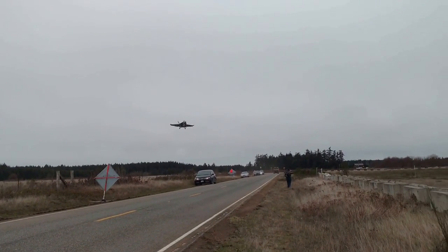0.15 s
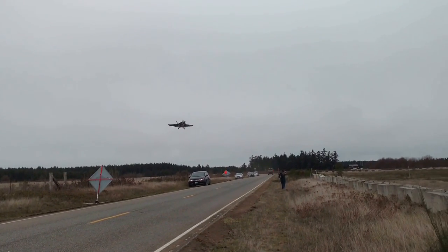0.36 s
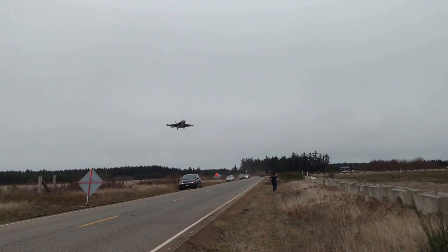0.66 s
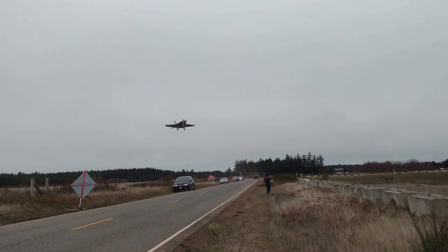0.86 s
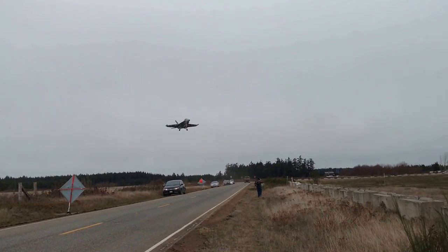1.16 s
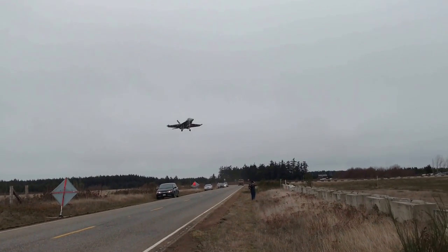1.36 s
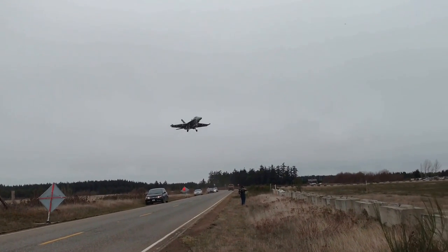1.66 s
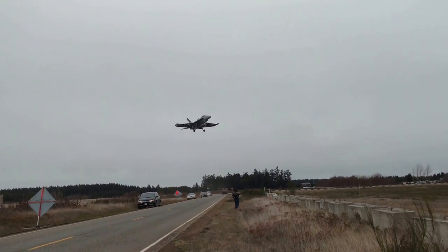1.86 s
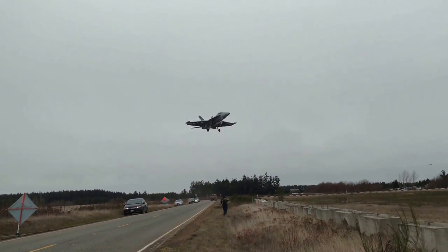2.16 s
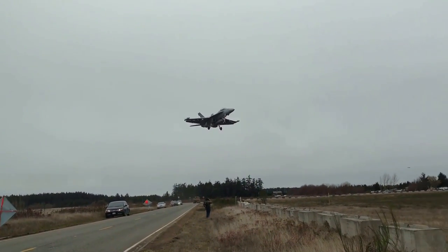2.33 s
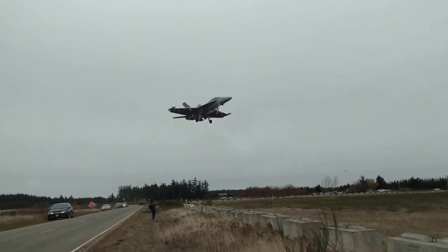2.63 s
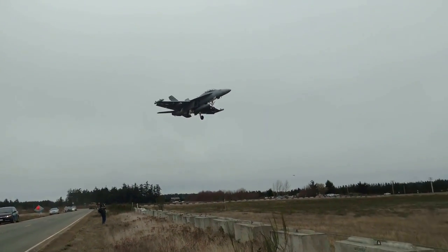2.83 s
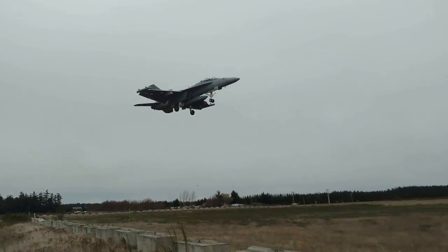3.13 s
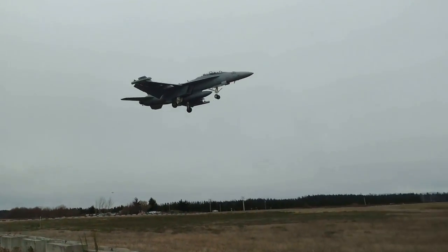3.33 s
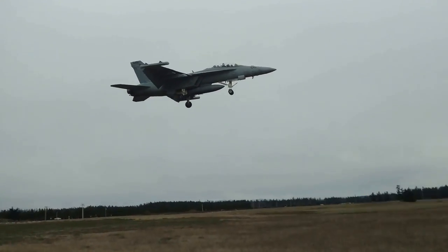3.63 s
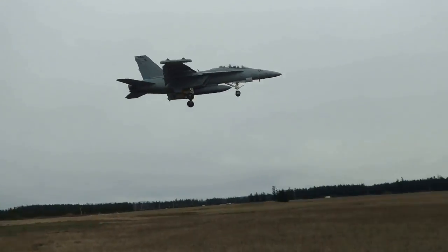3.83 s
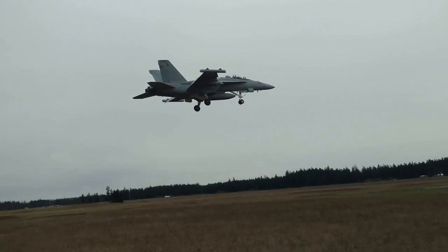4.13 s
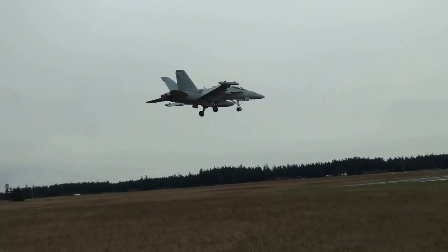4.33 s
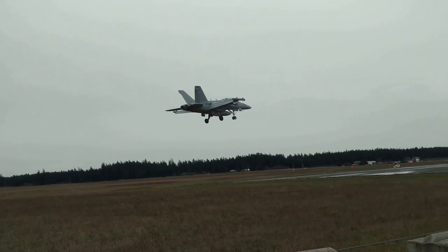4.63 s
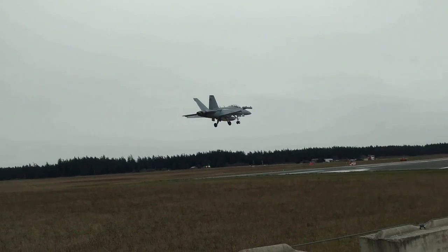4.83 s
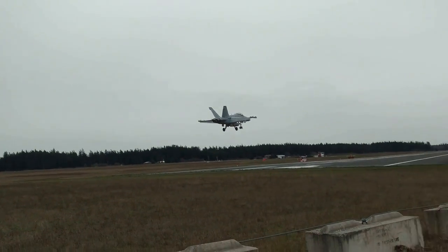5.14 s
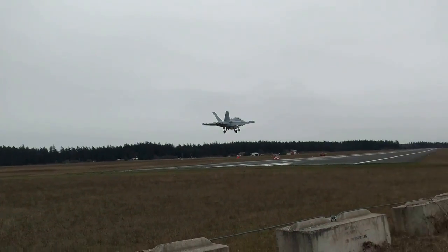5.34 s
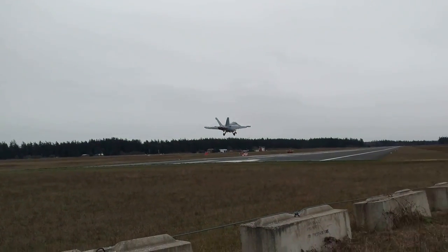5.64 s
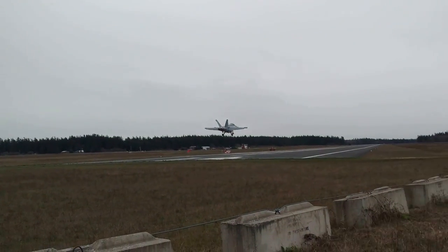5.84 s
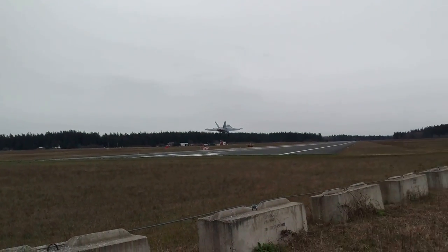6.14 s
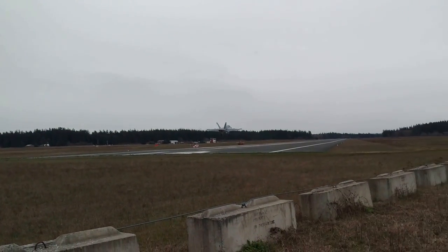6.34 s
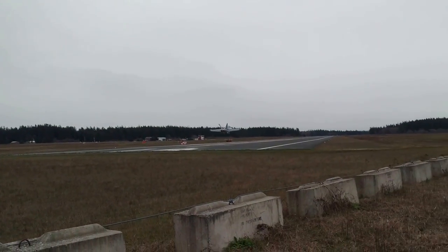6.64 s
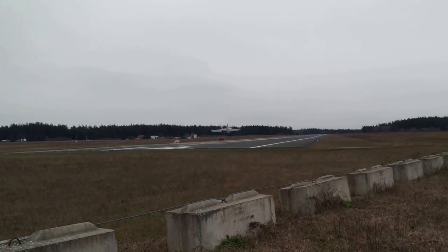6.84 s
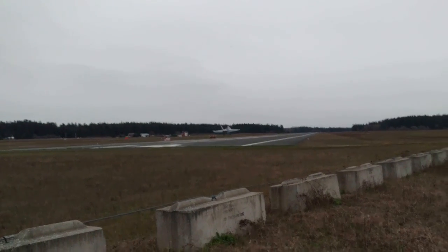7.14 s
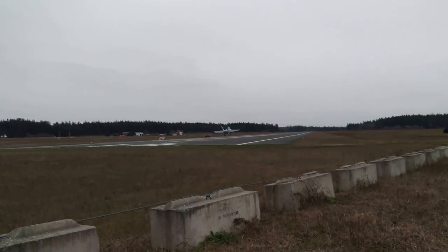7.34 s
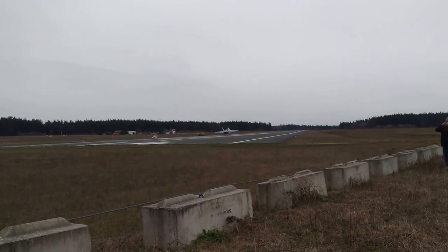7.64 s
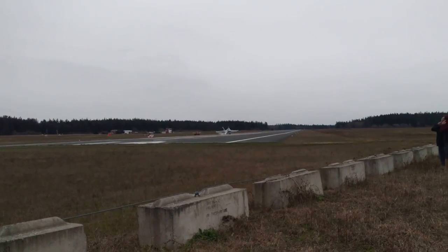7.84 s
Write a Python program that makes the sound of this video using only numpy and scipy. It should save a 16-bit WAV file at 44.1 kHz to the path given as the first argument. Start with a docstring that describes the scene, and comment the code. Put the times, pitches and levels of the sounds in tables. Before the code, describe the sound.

Outdoors, a piercing jet whine builds over airy roar, drops in pitch at the pass, and bursts into tearing, crackling exhaust that fades to rumble.

```python
"""Roadside under a landing approach: a fighter jet passes 55 m from a phone with two microphone ports.
A thin rustle and two ticks sound close by at first, while the intakes howl and whine ahead of the jet.
It comes abreast at 4.2 s; then the exhaust roars and cracks, as noise mixed with random shock fronts,
under spitting treble like that of overloaded peaks. Echoes off the grass comb the roar throughout.
The roar recedes, with a last tick near the end; the phone widens the stereo, flattens peaks and cuts the top."""
import sys
import numpy as np
from scipy import signal
from scipy.fft import rfft, irfft
from scipy.io import wavfile
from scipy.ndimage import map_coordinates

SR = 44100
rng = np.random.default_rng(int(sys.argv[2]) if len(sys.argv) > 2 else 0)


def wrap_up_sound(samples):
    """Save the sound to the file named by the first command line argument, as 16-bit audio."""
    columns = np.atleast_2d(samples).T
    # keep every value between -1 and 1, then stretch to whole-number steps
    tamed = np.clip(columns, -1, 1)
    steps = np.round(tamed * 32767).astype(np.int16)
    wavfile.write(sys.argv[1], SR, steps)


N = 351918
FRAME, HOP = 1024, 256  # samples
TIME = np.arange(N) / SR
FRAME_S = np.arange(-(-N // HOP) + 1) * HOP / SR
BIN_HZ = np.fft.rfftfreq(FRAME, 1 / SR)[:, None]


def undb(db):
    """Decibels to gain."""
    return 10 ** (np.asarray(db) / 20)


def read(table, at):
    """The columns of a table, joined by straight lines."""
    key, *columns = np.transpose(table)
    return [np.interp(at, key, column) for column in columns]


def over_pitch(hz, values):
    """Values joined on a log-frequency axis."""
    return np.interp(np.log(BIN_HZ + 1), np.log(hz), values)


def spectra(x):
    """Short-time spectra of a sound."""
    return signal.stft(x, nperseg=FRAME, noverlap=FRAME - HOP)[2]


def sound(z):
    """Short-time spectra back to samples."""
    return signal.istft(z, nperseg=FRAME, noverlap=FRAME - HOP)[1][..., :N]


def walk(rate, at):
    """Smooth chance with about `rate` turns a second and a spread near 1."""
    steps = rng.standard_normal(8192)
    return map_coordinates(steps, [at * rate], order=3, mode="wrap")


def bell(at, centre, width):
    """A smooth rise and fall around one moment or pitch."""
    return np.exp(-.5 * ((at - centre) / width) ** 2)


def band(track, width):
    """A moving peak or notch in dB; its width is a share of its centre."""
    hz, lift_db = read(track, FRAME_S)
    return lift_db * bell(BIN_HZ, hz, width * hz)


# faint ticks near the phone, before the thinning filter: start_s [s], peak_db [dB]
TICKS = [(.307, -48), (.577, -50), (7.544, -47)]
TICK_DECAY_S, HISS_DB = 0.00085, -82
RUSTLE_S, RUSTLE_WIDTH_S, RUSTLE_DB = 0.16, 0.053, -56.5


def rustle(low_hz, high_hz):
    """A brief rustle and three ticks close to the phone over faint hiss: noise thinned to a high band."""
    level = undb(HISS_DB) + undb(RUSTLE_DB) * bell(TIME, RUSTLE_S, RUSTLE_WIDTH_S)
    for start_s, peak_db in TICKS:
        decay = np.exp(-np.abs(TIME - start_s) / TICK_DECAY_S)
        level = level + undb(peak_db) * (TIME >= start_s) * decay
    thin = signal.butter(2, [low_hz, high_hz], "bandpass", fs=SR, output="sos")
    return signal.sosfilt(thin, level * rng.standard_normal((2, N)))


# lag of the echo off the grass behind the direct sound: time_s [s], lag_ms [ms]
GROUND_LAG = [(0.0, 0.57), (2.0, 0.75), (2.5, 1.48), (2.9, 2.03), (3.4, 3.1), (4.2, 3.07), (4.7, 2),
              (5.1, 2.02), (5.8, 1.94), (6.5, 1.78), (7.9, 1.54)]


def ground(reflection, soft_hz):
    """The echo off the grass combs the lows; the treble is soaked up."""
    lag_s = read(GROUND_LAG, FRAME_S)[0] / 1000
    echo = reflection / (1 + (BIN_HZ / soft_hz) ** 2)
    return np.abs(1 + echo * np.exp(-2j * np.pi * BIN_HZ * lag_s))


# Moving bands of the echoes, each with columns: time_s [s], centre_hz [Hz], lift_db [dB]
# hollow echo band that sinks as the jet nears
ECHO_BAND = [(1.4, 1990, 2.5), (1.82, 1930, 8.5), (2.05, 1970, 1.5), (2.33, 1810, 8.5), (2.48, 1860, 4),
             (2.65, 1820, 9), (2.87, 1710, 7.5), (3.05, 1590, -7)]
# lowest peak of the grass-echo comb, heard as a hump in the rumble
LOW_ECHO_PEAK = [(0, 214, 5), (2.2, 246, 1.5), (3.15, 213, -0.5), (3.9, 177, 10.5), (4.65, 246, 11),
                 (5.1, 279, 3.5), (6.5, 248, 5), (6.95, 254, 16), (7.9, 254, 8)]
# first notch of the grass-echo comb, deep as the jet leaves
ECHO_NOTCH = [(0, 480, 0.5), (1.15, 462, -4), (1.5, 462, 1), (5.3, 328, 4), (5.8, 305, -18), (6.4, 325, -9),
              (7.9, 354, -6.5)]
# peak of the comb from the grass echo, gliding through the roar
ECHO_PEAK = [(3.4, 790, 0), (3.9, 755, 4.5), (4.6, 710, 0.5), (4.9, 526, 2), (5.1, 510, 8), (5.85, 557, 4),
             (6.4, 474, 4), (7.9, 500, 7)]
# higher peak of the grass-echo comb, strongest once the jet has passed
UPPER_ECHO_PEAK = [(2.8, 1600, 1.5), (3.3, 1600, 0), (4.2, 1590, -1), (4.6, 1590, 5), (5.5, 1524, 9.5),
                   (6, 1450, 3.5), (7.9, 1460, 6)]


def echo_bands():
    """Echoes strengthen some pitches and weaken others; each peak or notch is drawn as a moving lift in dB."""
    low = band(LOW_ECHO_PEAK, width=0.17) + band(ECHO_NOTCH, width=0.23)
    high = band(ECHO_PEAK, width=0.093) + band(UPPER_ECHO_PEAK, width=0.078)
    return low + high + band(ECHO_BAND, width=0.045)


# compressor blade tone, moved by throttle and Doppler: time_s [s], pitch_hz [Hz], relative level_db [dB]
WHINE = [(.03, 5440, -45), (.27, 5670, -33), (.42, 5870, -44.5), (.65, 6000, -42.5), (.95, 5860, -43.5),
         (1.25, 5620, -38), (1.46, 5300, -31), (1.7, 5060, -29), (2, 4800, -30), (2.3, 4740, -28),
         (2.55, 4740, -25.5), (2.8, 4870, -27.5), (2.97, 4640, -22), (3.13, 4500, -27.5),
         (3.19, 4530, -30.5), (3.42, 4200, -35), (3.9, 3680, -32), (4.3, 3550, -80)]


def whine(level_db, width_hz, skirt_hz, skirt_db, haze_hz, haze_db, flicker_db, steady, octave_db):
    """Compressor blade tone: a wavering line and its octave, with a skirt and a wide haze from churning air."""
    hz, db = read(WHINE, TIME)
    wavering_hz = hz * (1 + 0.0043 * walk(15, TIME) + .006 * walk(160, TIME))
    turn = np.exp(2j * np.pi * np.cumsum(wavering_hz) / SR)
    core, skirt, haze = (walk(w, TIME) + 1j * walk(w, TIME) for w in (width_hz, skirt_hz, haze_hz))
    core = (core + steady) / np.sqrt(1 + steady ** 2 / 2)
    far = np.interp(TIME, [1.2, 2.1], [.6, .1])  # from far off the tone is more smeared
    tone = core * (1 - far) + skirt * (undb(skirt_db) + far * 0.36) + haze * far * undb(haze_db)
    # the air soaks up the octave at a distance
    overtone = undb(octave_db) * (1 - far) ** 2 * (skirt + .5 * haze)
    level = undb(db + level_db + flicker_db * walk(13, TIME))
    return level * np.real(tone * turn + overtone * turn ** 2)


# Moving bands of the approach, each with columns: time_s [s], centre_hz [Hz], lift_db [dB]
# broad howl while the throttle is up
HOWL = [(0, 950, -1), (.2, 940, 5), (.38, 1060, 10), (.75, 907, 10.5), (.97, 830, 7.5), (1.17, 790, 7.5),
        (1.22, 800, -2.5)]
# fine hiss of the intakes as they come close
INTAKE = [(2.2, 11500, -2.5), (3.0, 10900, 8), (3.4, 10480, 8), (3.65, 10000, 2)]
# broad rush of the compressors near their blade tone
BLADE_RUSH = [(1.3, 4840, 1), (1.9, 4500, 2), (2.7, 4400, 0), (3.3, 4300, 6.5), (3.7, 3970, 2.5),
              (4.4, 3750, 0)]


def approach_bands():
    """Howl, intake hiss and compressor rush, as moving lifts of the jet noise in dB."""
    return band(HOWL, width=0.32) + band(INTAKE, width=0.25) + band(BLADE_RUSH, width=0.059)


def turbulence(shared_db, own_db, rate):
    """Gusty air makes the whole roar surge, and each band flutter on its own."""
    centres = np.geomspace(100, 12000, 12)  # Hz
    own = sum(over_pitch(centres, row) * walk(rate, FRAME_S) for row in np.eye(len(centres)))
    shared = walk(19, FRAME_S) * over_pitch([200, 1800], [.3, 1.4])
    return own_db * own + shared_db * shared


def tearing(depth_db, rate):
    """Behind the jet the exhaust tears: a quick flutter of the roar, deepest just after the pass."""
    return depth_db * bell(FRAME_S, 4.9, 0.89) * walk(rate, FRAME_S) * over_pitch([250, 800], [.4, 1])


# pitches where rumble, roar, rush and hiss are set: pitch_hz [Hz]
REGISTER_HZ = [170, 650, 1600, 3500]
# surges and lulls of the roar: centre_s [s], half_width_s [s], bass_db [dB], treble_db [dB]
SURGES = [(.01, 0.044, -0.5, -0.5), (0.459, 0.083, 0.5, -3.5), (1.25, 0.082, -0.5, -2),
          (1.66, 0.16, 2.5, -3.5), (1.87, 0.089, -2.5, 1), (2.09, 0.093, -1.5, -5.5),
          (2.66, 0.038, -3, 1.7), (3.78, 0.14, 2, 1), (4.36, 0.058, -0.5, 1), (4.85, 0.035, 1.5, 1),
          (5.06, 0.065, 1.5, 0.5), (5.25, 0.06, -1, 1), (5.41, 0.093, -0.5, -2.5), (5.73, 0.041, 1, 1.5),
          (5.93, 0.044, 1.5, 0), (6.17, 0.13, 2.5, 5.5), (6.58, 0.043, 0.5, 3), (6.88, 0.14, -3, -0.7),
          (7.16, 0.023, 1.5, -2), (7.6, 0.035, -1.5, 0), (7.82, 0.15, 5.5, 3)]


def surges():
    """Each surge or lull is a smooth bell in dB, with its own depth in bass and treble."""
    return sum(over_pitch(REGISTER_HZ[1:3], [bass_db, treble_db]) * bell(FRAME_S, at, width)
               for at, width, bass_db, treble_db in SURGES)


# brief swells in the body of the roar: centre_s [s], half_width_s [s], centre_hz [Hz], lift_db [dB]
SWELLS = [(1.5, 0.091, 1560, 1.5), (1.67, .05, 1200, 5.5), (4.64, 0.06, 900, 4.5), (4.9, 0.07, 940, 3.5),
          (5.05, .06, 574, 3.5), (5.3, 0.045, 670, 5), (5.72, 0.046, 760, 7), (5.68, 0.12, 1750, 4.5),
          (6.18, .04, 810, 0.5), (6.58, .045, 1480, 4), (7.8, .08, 960, 4)]


def swells(width):
    """Eddies in the exhaust make one part of the roar swell for a moment."""
    return sum(lift_db * bell(FRAME_S, at, half_s) * bell(BIN_HZ, hz, width * hz)
               for at, half_s, hz, lift_db in SWELLS)


SPEED_M_S, MISS_M, ABREAST_S = 70, 55, 4.2  # miss: the closest distance to the phone


def flight():
    """Straight, steady flight: the angle off the nose in degrees, and the distance over the closest one."""
    ahead_m = SPEED_M_S * (ABREAST_S - FRAME_S)
    return np.degrees(np.arctan2(MISS_M, ahead_m)), np.hypot(ahead_m, MISS_M) / MISS_M


# lasting colour of the jet noise: pitch_hz [Hz], level_db [dB]
COLOUR = [(39.0, -33.5), (77.0, -9.5), (126.0, -0.5), (200.0, 1.5), (310.0, -1), (445.0, -10.5),
          (815.0, -0.5), (1100.0, -1.4), (1600.0, 3), (2300.0, 3), (3400.0, 3), (5100.0, -1.3),
          (7500.0, 0.4), (11000.0, 0)]
# jet noise by angle, before distance and air act on it:
# off_nose_deg [degrees], rumble_db [dB], roar_db [dB], rush_db [dB], hiss_db [dB]
BEAM = [(10.17, 10, 11, -1, -5), (13, 3, 8.5, -4, -11.5), (17.06, -1, 9.5, 4.5, -1.5),
        (23.4, 2.5, 5, -5.5, -4), (34.4, -3.5, -2.5, -5.5, -11), (53.7, -2.5, -1.5, -10, -13.5),
        (83, -3, -1.5, -8.5, -14.5), (110.5, 10.5, 9.5, -3, -9), (136, 15.5, 16, 0.5, -2),
        (144.9, 14.5, 12.5, -0.5, -4), (158.8, 15.5, 17.5, -5, -14), (163.5, 18, 6, -3.5, -14),
        (169.3, 14.5, 12.5, -7, -16)]
# treble loss at the closest distance; it grows with this power of the distance
AIR_DB_PER_KHZ, AIR_GROWTH = 3, 0.67


def roar_gain():
    """The angle colours the jet noise; distance weakens it and the air dulls it."""
    angle, distance = flight()
    registers = zip(np.eye(len(REGISTER_HZ)), read(BEAM, angle))
    beam_db = sum(over_pitch(REGISTER_HZ, row) * level for row, level in registers)
    above_khz = np.maximum(BIN_HZ - REGISTER_HZ[-1], 0) / 1000
    air_db = AIR_DB_PER_KHZ * distance ** AIR_GROWTH * above_khz
    db = beam_db + over_pitch(*np.transpose(COLOUR)) - air_db
    db = db + approach_bands() + echo_bands()
    db = db + tearing(depth_db=1, rate=45) + surges() + swells(width=0.1)
    db = db + turbulence(shared_db=0.37, own_db=1.2, rate=14)
    return undb(db) / distance


def shocks(rate, scatter_db, bunch_db):
    """Steep fronts as single-sample clicks, arriving at random with strength that rises and falls in bursts."""
    hit = rng.random(N) < rate / SR
    scatter = scatter_db * np.minimum(rng.standard_normal(N), 1)
    bunching = bunch_db * np.minimum(walk(35, TIME), 1)
    fronts = hit * undb(scatter + bunching)
    return fronts / np.std(fronts)


# shock strength in the exhaust, against the roar: time_s [s], level_db [dB]
CRACKLE = [(0, -18.5), (4.1, -19), (4.5, -4.5), (5.4, -2), (6.2, -2), (6.6, -11), (8, -10)]


def exhaust_noise():
    """Smooth jet noise mixed with crackling shock fronts at a steady overall power."""
    crackle = undb(read(CRACKLE, TIME)[0])
    fronts = shocks(rate=600, scatter_db=5.0, bunch_db=2.0)
    return (rng.standard_normal(N) + crackle * fronts) / np.sqrt(1 + crackle ** 2)


# the strongest shock fronts, each a separate crack, before filtering:
# start_s [s], body_db [dB over the exhaust noise], edge_db [dB]
CRACKS = [(5.365, 22, -28), (5.392, 21, -24), (5.497, 17, -31), (5.534, 13, -31), (5.607, 16, -30),
          (5.627, 17, -27), (5.713, 21, -29), (5.741, 21, -30), (5.825, 22, -33), (5.856, 24, -36),
          (5.893, 11, -36), (5.928, 20, -34), (5.951, 18, -30), (6.037, 15, -31.5), (6.058, 18, -29),
          (6.113, 24, -19), (6.131, 17, -30), (6.18, 21, -31), (6.236, 23, -28), (6.286, 16, -36)]


def cracks():
    """Single shock fronts that stand out of the crackle: their bodies and their sharp edges."""
    out = np.zeros((2, N))
    for start_s, body_db, edge_db in CRACKS:
        out[:, int(start_s * SR)] += undb([body_db, edge_db])
    return out


# spitting treble like that of overloaded peaks, before its highpass: time_s [s], level_db [dB]
SPIT = [(4.2, -90), (4.4, -50), (4.95, -38), (5.3, -50), (5.45, -59), (5.72, -54), (5.8, -61), (6.0, -64),
        (6.08, -59), (6.19, -56), (6.3, -76), (6.7, -95)]


def spit(edge_hz, burst_db):
    """Treble of overloaded peaks, as the loud roar and cracks clip: drawn as dense highpassed clicks."""
    clicks = np.array([shocks(rate=900, scatter_db=6.5, bunch_db=burst_db) for _ in range(2)])
    edges = undb(read(SPIT, TIME)[0]) * clicks + cracks()[1]
    return signal.sosfilt(signal.butter(2, edge_hz, "highpass", fs=SR, output="sos"), edges)


# lag of the right port behind the left: time_s [s], lag_ms [ms]
PORT_LAG = [(.3, 0.053), (2.2, 0.065), (3.3, 0.086), (4.05, .18), (4.7, 0.078), (5.8, 0.043), (7.5, 0.033)]
# the phone's ports: pitch_hz [Hz], right_db [dB], scattered [share], crossfeed [share]
PORTS = [(20, -5, 0.096, 0.95), (516, -2, 0.095, 1), (1500, -9.5, 0.22, 1), (2570, -8.5, 0.35, 0.75),
         (2980, 1, 0.31, 0.28), (3900, -2, 0.39, 0.47), (5230, -1, 0.49, 0.57), (6400, -5.5, 0.5, 0.81),
         (14000, -9, 0.55, 0.88)]


def scene():
    """The jet reaches the two ports directly, with a lag, and as scattered sound that differs in each."""
    gain = roar_gain() * ground(reflection=0.75, soft_hz=470)
    blades = whine(level_db=0.7, width_hz=120, skirt_hz=564, skirt_db=-8.0, haze_hz=1690, haze_db=-4.5,
                   flicker_db=2.3, steady=0.61, octave_db=-25.5)
    direct = gain * spectra(exhaust_noise() + cracks()[0]) + spectra(blades)
    right_db, scattered, _ = read(PORTS, BIN_HZ)
    lag_s = read(PORT_LAG, FRAME_S)[0] / 1000
    right = direct * undb(right_db) * np.exp(-2j * np.pi * BIN_HZ * lag_s)
    around = scattered * gain * spectra(rng.standard_normal((2, N)))
    jet = sound(np.array([direct, right]) + around)
    return jet + spit(edge_hz=5000, burst_db=4) + rustle(low_hz=6000, high_hz=14000)


def overload(x, ceiling, hardness):
    """Peaks are rounded off more and more as they near the ceiling."""
    return x / (1 + np.abs(x / ceiling) ** hardness) ** (1 / hardness)


CROSSFEED_MS, TOP_HZ = .386, 15300


def record(dry):
    """Each channel loses a late copy of the other, widening the image; loud peaks flatten; the top is cut."""
    hz = np.fft.rfftfreq(N, 1 / SR)
    crossfeed = read(PORTS, hz)[2]
    late = np.exp(-2j * np.pi * hz * CROSSFEED_MS / 1000)
    channels = rfft(dry)
    wide = irfft(channels - crossfeed * late * channels[::-1], N)
    flattened = overload(undb(-0.26) * wide, ceiling=1.03, hardness=6.5)
    return signal.sosfilt(signal.ellip(8, .2, 70, TOP_HZ, fs=SR, output="sos"), flattened)


dry = scene()
out = record(dry)
wrap_up_sound(out)
```